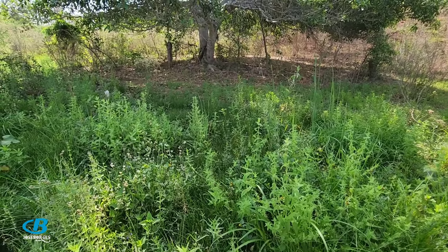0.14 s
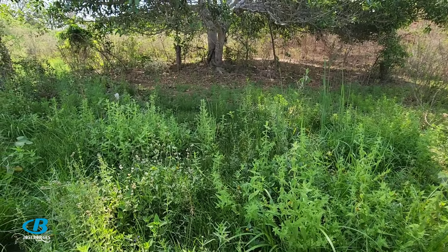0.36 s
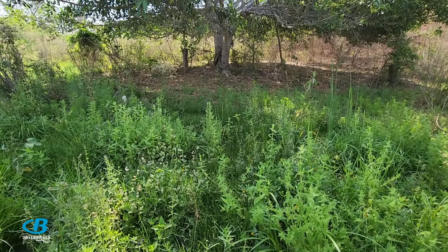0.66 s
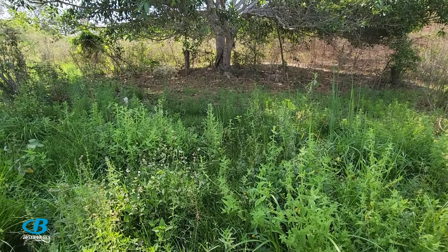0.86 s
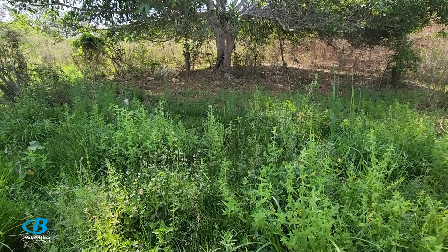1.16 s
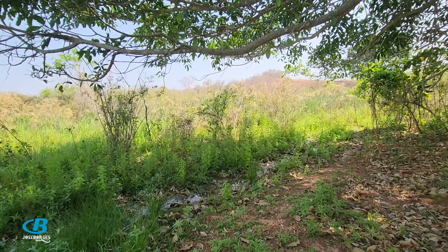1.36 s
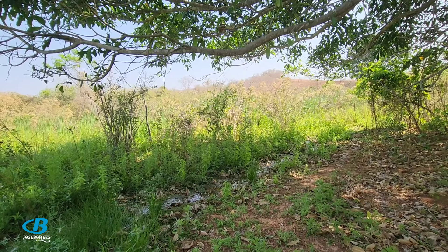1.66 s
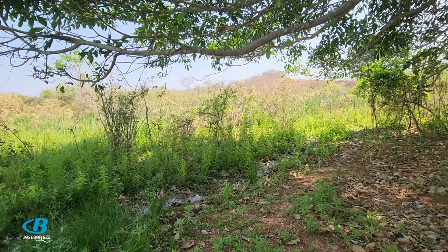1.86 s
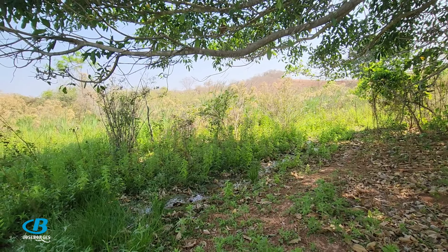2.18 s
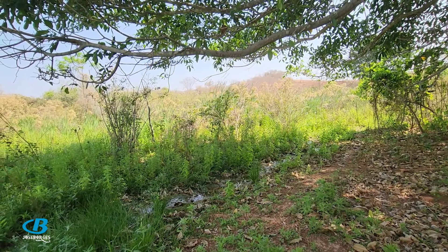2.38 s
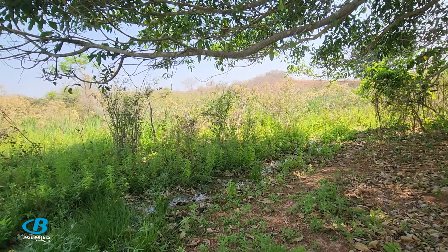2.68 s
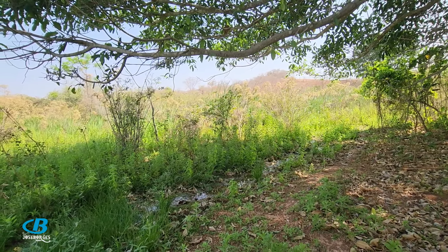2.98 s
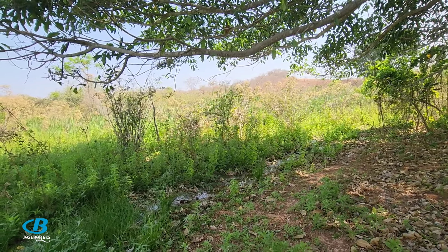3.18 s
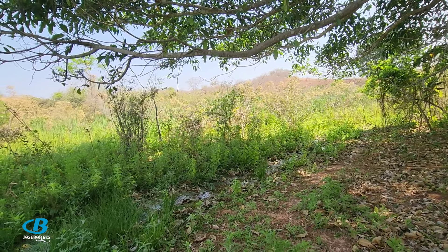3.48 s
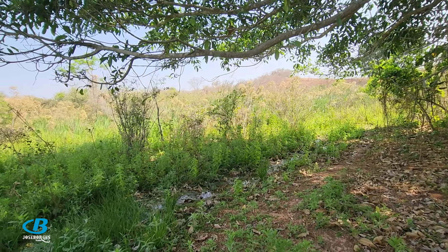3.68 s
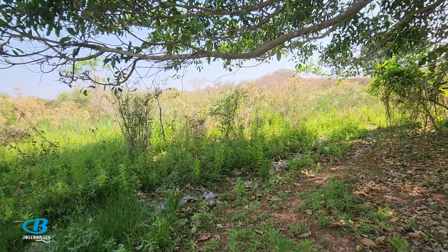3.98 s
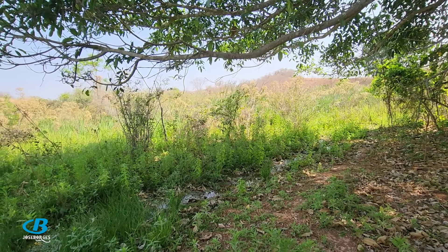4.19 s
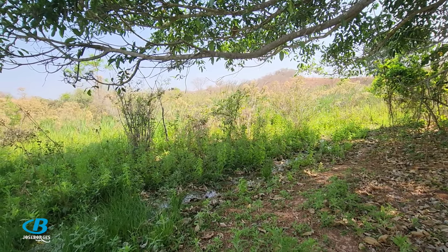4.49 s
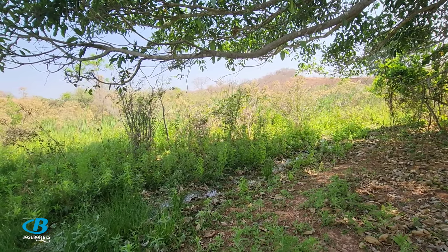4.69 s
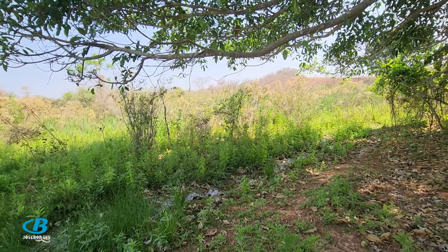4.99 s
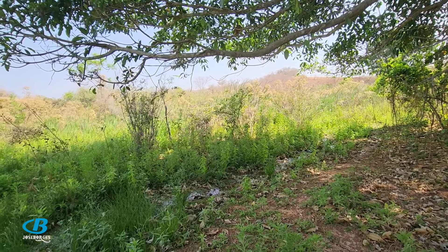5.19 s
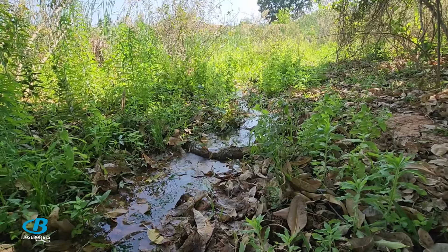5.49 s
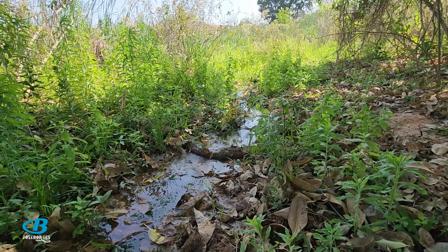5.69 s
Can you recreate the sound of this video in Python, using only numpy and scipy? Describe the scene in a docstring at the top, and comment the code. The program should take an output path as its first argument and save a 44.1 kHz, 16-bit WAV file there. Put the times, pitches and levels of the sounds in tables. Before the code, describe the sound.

A quiet weedy field full of crickets, in stereo, with faint open air and fine hiss. A blurred far chorus around 6 to 6.7 kHz drones throughout. From 0 to 1.3 s a fast, raspy buzz near 8.6 kHz, pulsing high trills and a lower sliding chirp lean left, over a distant engine: unsteady rumble near 64 Hz and hollow midrange roar. At 1.3 s the engine cuts off abruptly. Until 5.3 s the buzz is stronger and cricket trills of roughly half a second overlap at several pitches, while dry leaves crackle and snap sparsely, notably around 1.7, 2.4, 3.2 and 3.8 s. At 5.3 s the near singers stop; a slightly fuller far chorus remains with a dull soft rush. Close leaves crunch, a foot lands at 5.6 s with a click and short dull thud, then a lighter one at 5.73 s, with sharp snaps and small rising wet bubbles until 5.8 s.

```python
"""Crickets sing in a weedy field, heard from three spots in turn, with abrupt changes between them.
First a buzz, trills and a far chorus, all scraped-wing tones, sound over an engine of wavering tone and noise.
At the second spot the crickets go on while dry leaves crackle underfoot, as bursts of random fractures.
At the third only the far chorus still sings; a foot presses into wet leaf litter: noise grains, decaying
thuds and ringing bubbles. Shaped noise gives the faint air and hiss throughout."""
import sys
import numpy as np
from scipy import signal
from scipy.fft import rfft, irfft, next_fast_len
from scipy.io import wavfile
from scipy.ndimage import uniform_filter1d, map_coordinates

SR = 44100
rng = np.random.default_rng(int(sys.argv[2]) if len(sys.argv) > 2 else 0)


def unload_audio(sound):
    """Save the sound as a 16-bit wav file, at the path given as the first command line argument."""
    columns = np.transpose(np.atleast_2d(sound))
    # keep every value between -1 and 1, then stretch to whole-number steps
    steps = np.round(np.clip(columns, -1, 1) * 32767)
    wavfile.write(sys.argv[1], SR, steps.astype(np.int16))


N = 257984
TOP_HZ = 15800  # upper band limit

# Start of each listening spot, then an end bound: t/s
SPOT_STARTS = [0, 1.295, 5.287, 6]
# One wing stroke of a high cricket: share of the stroke (0-1), f/carrier, relative level/dB
HIGH_STROKE = [(0, .95, -19), (.22, .965, -10), (0.341, .997, -1.5), (.5, 1.003, -1.5), (.66, .999, -4),
               (.8, .97, -15), (1, .95, -27.5)]
# Leaves crushed under a shifting foot: t/s, length/s, level/dB before the envelope
CRUSHES = [(1.639, 0.215, -59.5), (2.332, 0.0928, -58.5), (2.879, 0.1455, -63), (3.175, 0.0754, -54.5),
           (3.718, .16, -51.5), (5.277, .1, -58), (5.35, .5, -61), (5.658, 0.1783, -49)]
# Colour of a dry leaf: f/Hz, relative level/dB
LEAF = [(300, -45), (1050, -16), (1700, -2), (3500, 0.5), (7000, 1.5), (10000, -12), (16000, -12.5)]


def amp(db):
    """Level: decibels to an amplitude ratio."""
    return 10 ** (np.asarray(db) / 20)


def unit(x):
    """Normalisation: each channel at rms 1."""
    return x / np.sqrt(np.mean(x ** 2, axis=-1, keepdims=True) + 1e-20)


def along(points, hz):
    """Interpolation of (f/Hz, value) points on a logarithmic frequency axis."""
    f, v = np.transpose(points)
    return np.interp(np.log(hz + 1), np.log(f + 1), v)


def clock(length):
    """Sampling: the sample times over a length in seconds."""
    return np.arange(int(length * SR)) / SR


def wobble(rate):
    """Slow random modulation: a smooth curve through random knots, rate knots a second."""
    knots = rng.standard_normal(int(N * rate / SR) + 4)
    return map_coordinates(knots, [np.arange(N) * rate / SR])


def filtered(x, response):
    """Linear filtering: the spectrum of x times a response of frequency."""
    m = next_fast_len(x.shape[-1] + 8192)
    spectrum = rfft(x, m) * response(np.fft.rfftfreq(m, 1 / SR))
    return irfft(spectrum, m)[..., :x.shape[-1]]


def add(out, s, x, pan_db=0):
    """Superposition: mix a sound in at s seconds, its level leaning to the left by pan_db."""
    i = round(s * SR)
    x = x[..., max(-i, 0):max(N - i, 0)]
    out[:, max(i, 0):max(i, 0) + x.shape[-1]] += x * amp([[pan_db / 2], [-pan_db / 2]])


def spot(index):
    """Gating: 1 while we listen from this spot, else 0, with edges of a few milliseconds."""
    t = np.arange(N) / SR
    here = (t >= SPOT_STARTS[index]) & (t < SPOT_STARTS[index + 1])
    return uniform_filter1d(1. * here, size=200)


def spot_at(s):
    """Sequence of spots: the index of the one we listen from at s seconds."""
    return max(int(np.searchsorted(SPOT_STARTS, s)) - 1, 0)


def rush(spectrum):
    """Interaural correlation: stereo noise of rms 1, nearly mono in the bass, from a mid and a side part."""
    # f/Hz, correlation of left with right (-1 to 1)
    correlation = [(30, 0.71), (130, 0.98), (260, 0.375), (600, -0.017), (1200, -0.477), (2500, 0.302),
                   (15000, -0.28)]

    def response(hz):
        turn = np.arccos(np.clip(along(correlation, hz), -1, 1)) / 2
        return amp(along(spectrum, hz)) * [np.cos(turn), np.sin(turn)]

    mid, side = filtered(rng.standard_normal((2, N)), response)
    return unit(np.array([mid + side, mid - side]))


def foliage(x, wet_db, t60):
    """Multiple scattering: stems and leaves add a short diffuse tail at each ear."""
    t = clock(.15)
    tail = rng.standard_normal((2, len(t))) * amp(-60 * t / t60)
    tail *= amp(wet_db) / np.linalg.norm(tail[0])
    tail[:, 0] += 1  # direct sound
    return signal.fftconvolve(np.atleast_2d(x), tail, axes=1)[:, :x.shape[-1]]


def stridulate(stroke, t, rate, carrier_hz, rough, overtone_db, lead_ms=0):
    """Stridulation: a scraper runs over the wing's file; each stroke glides, uneven from tooth to tooth."""
    which, share = (t * rate).astype(int), t * rate % 1
    at, bend, db = np.transpose(stroke)
    # each stroke has its own chance pitch and level; the teeth vary faster
    chance = rng.standard_normal((which[-1] + 1, 2))[which]
    teeth = uniform_filter1d(rng.standard_normal((2, len(t))), size=40)
    teeth = unit(uniform_filter1d(teeth, size=30))
    pitch = np.interp(share, at, bend) + 0.002008 * chance[:, 0] + 0.02016 * rough * teeth[0]
    hz = carrier_hz * pitch
    level = amp(np.interp(share, at, db) + 1.007 * chance[:, 1] + 4.43 * rough * teeth[1])
    # the left ear leads in phase
    phase = 2 * np.pi * (np.cumsum(hz) / SR + np.array([[lead_ms], [0]]) * hz / 1000)
    return level * (np.sin(phase) + amp(overtone_db) * np.sin(2 * phase))


def buzzer():
    """Comb filtering: a high buzz, coloured by wing resonance, drifts in pitch and has one early echo."""
    # Wing stroke: share of the stroke (0-1), f/carrier, relative level/dB
    buzz_stroke = [(0, .95, -16), (.15, .96, -14), (0.259, 0.982, 9), (.38, 1.03, -3.5), (.5, 1.065, -3.5),
                   (.62, 1.055, -3), (.72, 1.01, -1.5), (.85, .95, -6), (1, .94, -15.5)]
    # A row for each of the first two spots: first stroke t/s, strokes per second [1/s], level/dB,
    # left-right/dB, left lead/ms
    buzzes = [(-.009, 73, -55, 5.5, 0.0515), (1.306, 62.93, -48, 7.5, 0.4152)]
    # Carrier of the buzz: t/s, f/Hz
    buzz_pitch = [(1.32, 8647), (3.73, 8796), (3.77, 8621), (5.27, 8507)]
    # Wing resonance: f/Hz, relative level/dB
    buzz_wing = [(6800, -11), (7900, 1), (8400, -0.5), (9300, -0.5), (9550, -2.5), (9850, -33.5)]
    echo_s, echo_db = .006995, -10.5  # delay, level re direct sound
    fade_db_per_s = .9  # weakening within each spot

    def colour(hz):
        echo = amp(echo_db) * np.exp(-2j * np.pi * hz * echo_s)
        return amp(along(buzz_wing, hz)) * (1 + echo)

    out = np.zeros((2, N))
    for i, (start, rate, db, pan_db, lead_ms) in enumerate(buzzes):
        t = clock(SPOT_STARTS[i + 1] - start)
        hz = np.interp(start + t, *np.transpose(buzz_pitch))
        song = stridulate(buzz_stroke, t, rate, hz, rough=0.21, overtone_db=-49, lead_ms=lead_ms)
        song = song * amp(-fade_db_per_s * t)
        heard = filtered(foliage(song, wet_db=-1.5, t60=0.0562), colour)
        add(out, start, amp(db) * unit(heard), pan_db)
    return out * amp(0.6 * wobble(3.113))


def cricket(trills, voice, stroke, rough, overtone_db, wet_db, t60, swell_db, glide, settle, fade,
            sag_hz_per_s=0):
    """Exponential onset: level and pitch settle together in a trill that reaches us through the weeds."""
    out = np.zeros((2, N))
    for start, length, db in trills:
        here = spot_at(start + length / 2)
        rate, hz, pan_db, lead_ms = voice[min(here, len(voice) - 1)]
        hz = hz - sag_hz_per_s * (start - SPOT_STARTS[here])
        t = clock(length + .05)  # leaves room for the scattered tail
        unsettled = np.exp(-t / settle)
        envelope = amp(-swell_db * unsettled) * np.clip((length - t) / fade, 0, 1)
        song = stridulate(stroke, t, rate, hz * (1 - glide * unsettled), rough, overtone_db, lead_ms)
        heard = foliage(envelope * song, wet_db, t60)
        add(out, start, amp(db) * unit(heard), pan_db)
    return out


def near_crickets():
    """Amplitude modulation: wing strokes pulse the carriers of three voices in short trills."""
    # Trills of each voice: t/s, length/s, level/dB
    neighbour_trills = [(0, 0.54, -50.5), (.543, .75, -47), (1.544, 1.09, -54.5), (3.199, 0.628, -51.5),
                        (4.108, .65, -52.5), (5.088, 0.176, -53)]
    high_trills = [(.189, .37, -46.5), (.946, 0.323, -51), (1.29, 0.257, -53), (1.799, 0.616, -53.5),
                   (2.649, 0.552, -47.5), (3.468, .6, -49), (4.345, 0.554, -47.5), (5.215, 0.0708, -49.5)]
    mid_trills = [(1.299, 0.179, -56), (1.837, 0.612, -57), (2.86, 0.625, -50.5), (3.758, .64, -49),
                  (4.779, .505, -49)]
    # Voices, a row per spot, the last row for later spots too: strokes per second [1/s], carrier f/Hz
    # (for mid, at the start of the spot), left-right/dB, left lead/ms
    neighbour_voice = [(33.12, 6180, 11.7, 0.0592), (32.65, 6280, 4.7, 0.0331)]
    high_voice = [(37.98, 6600, 12.85, 0.2084), (35.47, 6635, 7.15, 0.1776)]
    mid_voice = [None, (31.5, 5700, -0.5, 0.29)]
    # Wing stroke: share of the stroke (0-1), f/carrier, relative level/dB
    mid_stroke = [(0, 0.9, -22), (.2, .98, -34), (.3, .99, -4.5), (.45, 1.005, -2.5), (.66, 1.008, -9.5),
                  (.78, .975, -3), (1, 1.2, -29)]
    neighbours = cricket(neighbour_trills, neighbour_voice, HIGH_STROKE, rough=0.4162, overtone_db=-24,
                         wet_db=-7.0, t60=0.0683, swell_db=0, glide=0, settle=.05, fade=0.0042)
    high = cricket(high_trills, high_voice, HIGH_STROKE, rough=0.321, overtone_db=-26, wet_db=-5.5,
                   t60=0.0764, swell_db=1, glide=0.00306, settle=0.0412, fade=0.00193)
    mid = cricket(mid_trills, mid_voice, mid_stroke, rough=0.193, overtone_db=-27, wet_db=-8, t60=0.0564,
                  swell_db=2.0, glide=0, settle=0.027, fade=.004, sag_hz_per_s=18)
    return neighbours + high + mid


def low_crickets():
    """Frequency glide: low trills swell and slide up; a farther, more blurred caller is strictly periodic."""
    # Wing stroke: share of the stroke (0-1), f/carrier, relative level/dB
    low_stroke = [(0, .98, -20.5), (0.119, .995, -23.5), (.24, 1.012, -1), (0.479, 1.01, 1.5),
                  (.68, .985, -1), (0.829, .935, -6), (1, .92, -27)]
    # Near trills: t/s, length/s, level/dB
    low_trills = [(.688, .44, -45.5), (1.474, 0.548, -58), (2.565, 0.622, -58), (3.841, .47, -55),
                  (5.006, 0.2985, -55.5)]
    # Far calls, a row for each of the first two spots: first call t/s, length/s, level/dB
    far_low_calls = [(-.217, .5, -53.5), (.93, .56, -65)]
    # Voices, a row per spot: strokes per second [1/s], carrier f/Hz, left-right/dB, left lead/ms
    low_voice = [(51.94, 4637, 2.49, 0.1663), (50.94, 4725, 3.73, 0.1767)]
    far_low_voice = [(49.71, 4745, 3.62, 0.0564), (50.24, 4765, 2, 0.0484)]
    call_every_s = 1.057

    def sing(trills, voice, wet_db):
        return cricket(trills, voice, low_stroke, rough=0.33, overtone_db=-25, wet_db=wet_db, t60=0.05,
                       swell_db=17, glide=0.06, settle=.115, fade=0.0694)

    out = sing(low_trills, low_voice, wet_db=-1)
    for i, (first, length, db) in enumerate(far_low_calls):
        calls = [(s, length, db) for s in np.arange(first, SPOT_STARTS[i + 1], call_every_s)]
        out = out + spot(index=i) * sing(calls, [far_low_voice[i]], wet_db=5)
    return out


def chorus(low_hz, high_hz, count):
    """Incoherent superposition: far crickets, each at its own pitch and pace, blur into one drone."""
    voices = 0
    for hz in np.linspace(low_hz, high_hz, count):
        t = np.arange(N) / SR + rng.random()
        song = stridulate(HIGH_STROKE, t, rng.uniform(30, 38), hz, rough=0.4994, overtone_db=-32)
        heard = unit(foliage(song, wet_db=7.0, t60=0.161))
        voices = voices + heard * amp(1.0 * wobble(1.89))
    return unit(voices)


def far_crickets():
    """Summed choruses: the main drone never stops; higher and lower singers join it at the last spot."""
    # Main drone at each spot: level/dB
    chorus_db = [-52, -53, -53.5]
    level = sum(amp(db) * spot(index=i) for i, db in enumerate(chorus_db))
    drone = level * chorus(low_hz=6077, high_hz=6657, count=6)
    higher = amp(-58.5) * chorus(low_hz=6540, high_hz=6954, count=3)
    lower = amp(-68.5) * chorus(low_hz=4540, high_hz=4714, count=2)
    return drone + spot(index=2) * (higher + lower)


def engine():
    """Frequency modulation: a distant engine's wavering firing tone in low rumble, a hollow roar above."""
    # Noise spectra: f/Hz, relative level/dB
    rumble = [(12, -45.5), (20, -21.5), (48, -2.5), (70, -2.5), (102, -2.5), (134, -12.5), (189, -12),
              (236, -30.5), (300, -43.5), (390, -46.5), (660, -120)]
    roar = [(150, -33.5), (250, -10.5), (367, -6.5), (403, -4.5), (502, -1), (871, 1), (1270, -11),
            (1620, -8.5), (2270, -21.5), (3000, -26), (3900, -43), (6600, -120)]
    firing_hz = 64.3 + 1.187 * wobble(5.28)
    tone = np.sin(2 * np.pi * np.cumsum(firing_hz) / SR) * amp(-49.3 + 3 * wobble(6.89))
    noise = amp(-50.0) * rush(rumble) + amp(-55.5 + wobble(9.99)) * rush(roar)
    return spot(index=0) * (tone + noise)


def air():
    """Shaped noise: faint open air, a fine hiss from the field on the left, a dull rush at the last spot."""
    # Hiss over time: t/s, relative level/dB
    hiss_levels = [(0.0, -74), (3.13, -72), (3.31, -74.5), (3.93, -70.5), (4.12, -76), (4.98, -81),
                   (5.85, -74)]
    # Spectra of hiss, open air and dull rush: f/Hz, relative level/dB
    fizz = [(3000, -19.5), (6000, -17), (7500, 7), (10000, -25.5), (12500, 5), (16000, -1)]
    open_air = [(20, 1), (60, 6), (140, -3), (300, -14.5), (1000, -13.5), (3000, -16), (7500, -21.5),
                (10000, -50.5), (12500, -26.5), (16000, -26)]
    murmur = [(30, -3), (70, -4), (130, -5.5), (400, -6.5), (900, -13), (3000, -19.5)]
    hiss_db = np.interp(np.arange(N) / SR, *np.transpose(hiss_levels))
    hiss = amp(hiss_db + 12.5) * rush(fizz) * amp([[3], [-7]])
    dull = spot(index=2) * amp(-65.5) * rush(murmur)
    return hiss + dull + amp(-65.5 + 0.71 * wobble(5.125)) * rush(open_air)


def crackle(length, density, spread_db):
    """Impulse noise: tiny fractures, density a second and random in size, coloured by the dry leaf."""
    size = len(clock(length))
    happens = rng.random(size) < density / SR
    cracks = happens * rng.standard_normal(size) * amp(spread_db * rng.standard_normal(size))
    coloured = filtered(cracks, lambda hz: amp(along(LEAF, hz)))
    return unit(foliage(coloured, wet_db=14, t60=0.005))


def small_snaps():
    """Random fracture: each shift of a foot breaks a few more leaves, as (t/s, level/dB, treble/dB)."""
    snaps_per_s, mean_db, spread_db = 16, -50, 3
    return [(s + length * rng.random(), mean_db + spread_db * rng.standard_normal(), rng.normal(-7, 3))
            for s, length, db in CRUSHES for _ in range(int(length * snaps_per_s))]


def leaves():
    """Brittle fracture: crushed litter crackles; a snapping leaf cracks once, crumbles and has resonances."""
    # The loudest snaps: t/s, relative level/dB, relative treble/dB
    loud_snaps = [(1.668, -44.5, -3.5), (1.744, -43, -6.5), (1.789, -41.5, -19.5), (2.36, -43.5, -9),
                  (2.566, -51, -19), (3.212, -42.5, 6.5), (3.282, -53.5, 14.5), (3.695, -46.5, 5),
                  (3.773, -43, 4), (3.795, -41, 5), (4.184, -46.5, -1.5), (5.324, -42, -10),
                  (5.511, -46, -5), (5.664, -47.5, 7.5), (5.682, -37.5, -23), (5.768, -39, -12),
                  (5.776, -32, -12.5)]
    # Snaps at each spot: left-right/dB
    snap_pan_db = [0, -9.5, -0.5]
    out, t = np.zeros((2, N)), clock(.06)
    for s, length, db in CRUSHES:
        grains = crackle(length, density=1800, spread_db=1.5)
        add(out, s, amp(db) * grains * np.hanning(grains.shape[1]) ** .5, pan_db=-3)
    for s, db, treble_db in loud_snaps + small_snaps():
        uneven = unit(uniform_filter1d(rng.standard_normal(len(t)), size=40))
        crumble = unit(amp(3.5 * uneven))
        envelope = amp(-60 * t / .007) + crumble * amp(-8 - 60 * t / .055)
        burst = rng.standard_normal((2, len(t))) * envelope
        # random peaks and dips, drawn anew for each leaf
        ripple = np.column_stack([np.geomspace(1000, TOP_HZ, 24), rng.normal(0, 2.5, 24)])
        treble = [(4000, 0.0019), (12000, treble_db + 4.5)]
        snap = filtered(burst, lambda hz: amp(along(LEAF, hz) + along(ripple, hz) + along(treble, hz)))
        add(out, s, amp(db + 2.5) * snap, snap_pan_db[spot_at(s)])
    return out


def bubbles(count):
    """Bubble resonance: wet mud gives up bubbles that ring and rise in pitch; the small ones die first."""
    # The loudest bubbles: t/s, starting f/Hz, level/dB before the envelope
    loud_bubbles = [(5.683, 5100, -35), (5.684, 2030, -45), (5.731, 1998, -39), (5.793, 702.6, -51),
                    (5.794, 1558, -49)]
    life_cycles = 55  # periods of the starting pitch until 60 dB down
    mean_rise = .16  # average pitch rise over that life, as a share
    squelch_s, lesser_hz, lesser_db = (5.55, 5.8), 2000, -54
    out, t = np.zeros((2, N)), clock(.15)
    lesser = [(rng.uniform(*squelch_s), lesser_hz * 2 ** rng.uniform(-.5, 1), lesser_db)
              for _ in range(count)]
    for s, hz, db in loud_bubbles + lesser:
        age = t * hz / life_cycles
        ring = np.sin(2 * np.pi * hz * t * (1 + mean_rise * age))
        envelope = amp(db - 60 * age) * (1 - np.exp(-t / 0.00073))
        add(out, s, ring * envelope)
    return out


def steps():
    """Damped impact: the foot lands with a click, a short push and a dull thud."""
    # Footfalls on soft ground: t/s, thud level/dB, click level/dB, both before decay and panning
    footfalls = [(5.605, -34, -31), (5.726, -42, -46)]
    knock_colour = [(300, 4.5), (700, 3.0), (2500, -18.5)]  # f/Hz, relative level/dB
    out, t = np.zeros((2, N)), clock(.15)
    for s, thud_db, click_db in footfalls:
        thud = -np.sin(2 * np.pi * 105 * t) * amp(thud_db - 60 * t / 0.06)
        push = -np.sin(2 * np.pi * 420 * t) * amp(thud_db + 2 - 60 * t / 0.00777)
        click = rng.standard_normal((2, len(t))) * amp(click_db - 60 * t / 0.00317)
        burst = rng.standard_normal((2, len(t))) * amp(-60 * t / 0.0139)
        knock = filtered(burst, lambda hz: amp(along(knock_colour, hz)))
        add(out, s, thud + push + amp(thud_db + 12) * knock)
        add(out, s, click, pan_db=-9.5)
    return out


def scene():
    """Linear superposition of singers, background and feet."""
    singers = buzzer() + near_crickets() + low_crickets() + far_crickets()
    background = engine() + air()
    feet = leaves() + bubbles(count=12) + steps()
    return singers + background + feet


def record(dry):
    """Band limiting: nothing above the upper band limit passes."""
    return filtered(dry, lambda hz: hz < TOP_HZ)


dry = scene()
out = record(dry)
unload_audio(out)
```